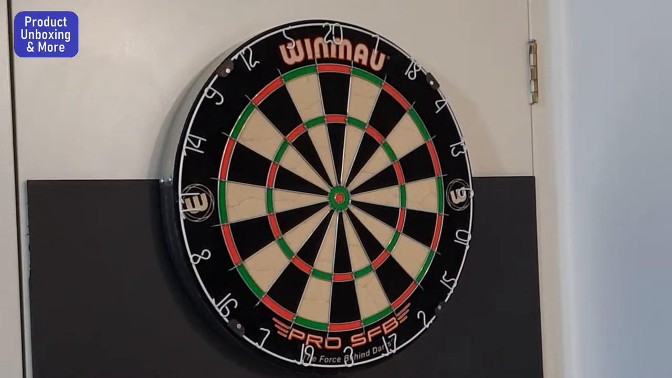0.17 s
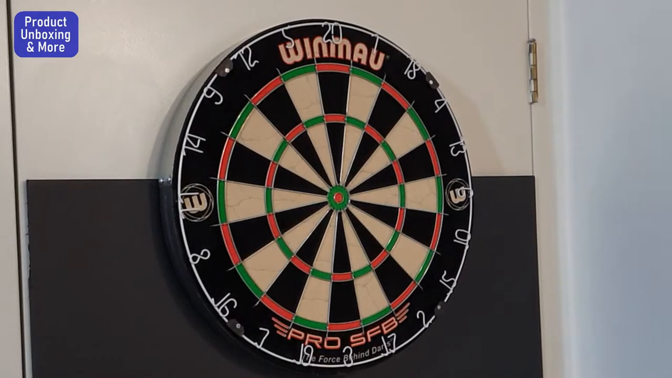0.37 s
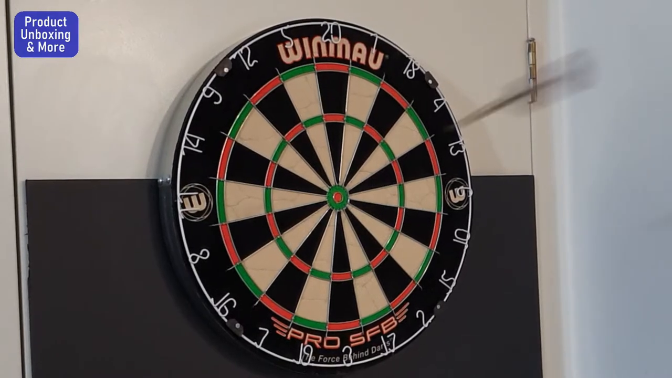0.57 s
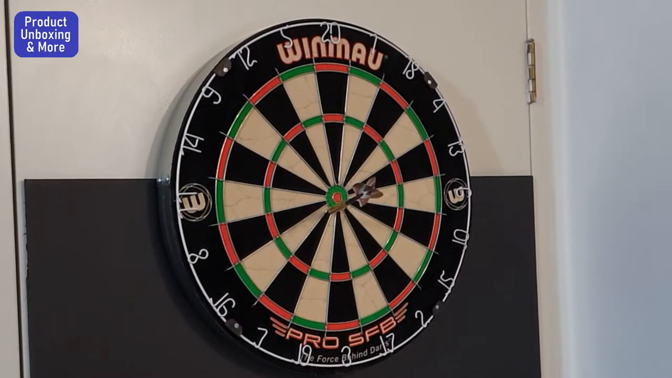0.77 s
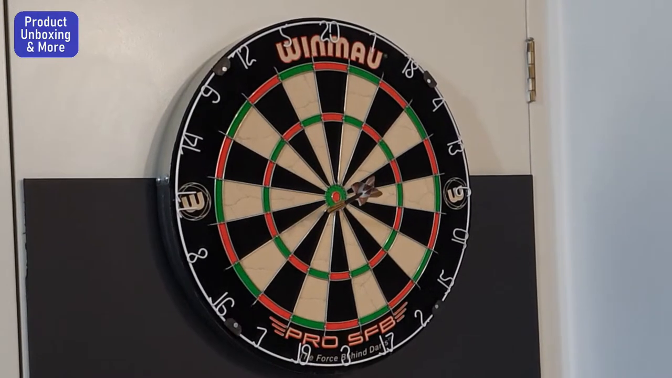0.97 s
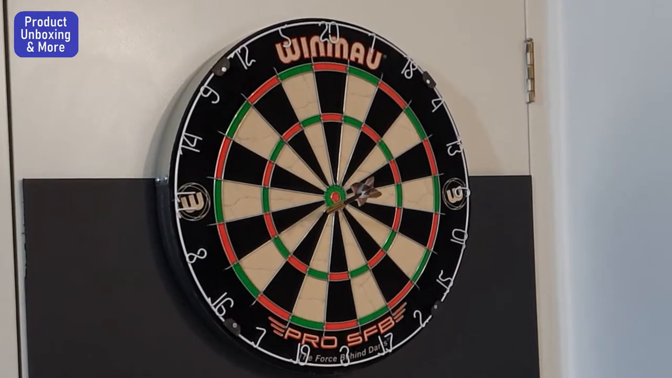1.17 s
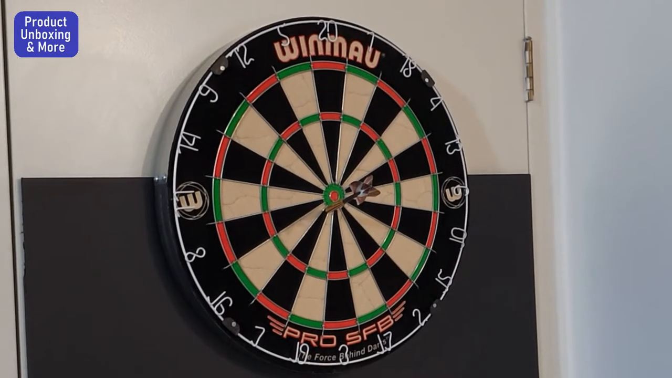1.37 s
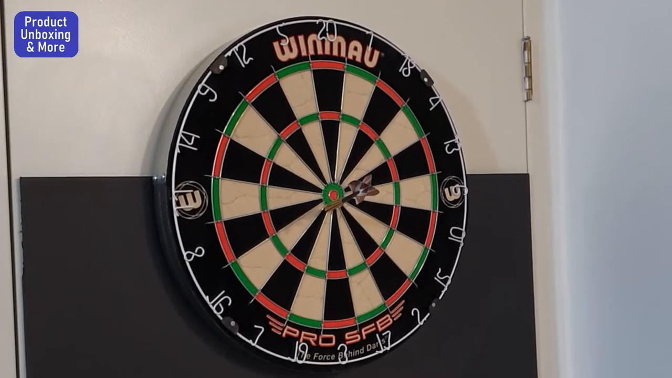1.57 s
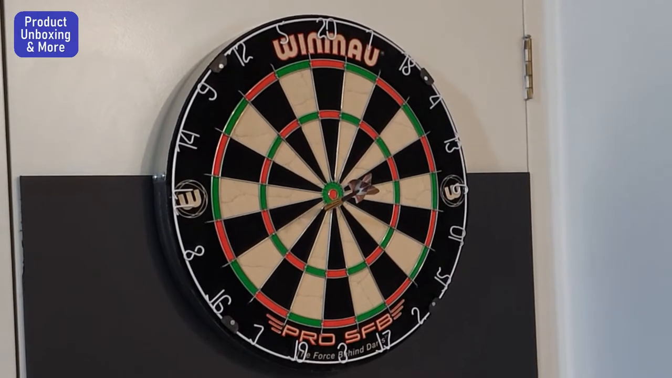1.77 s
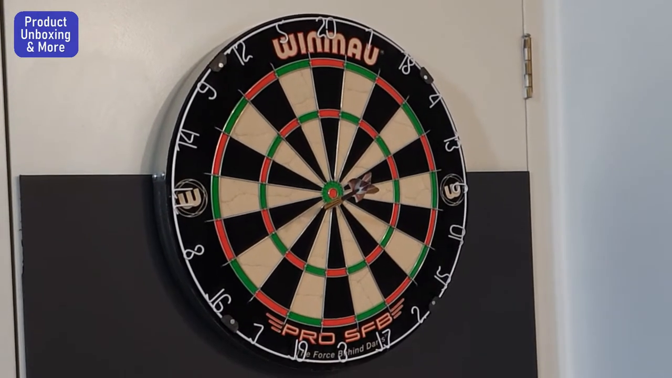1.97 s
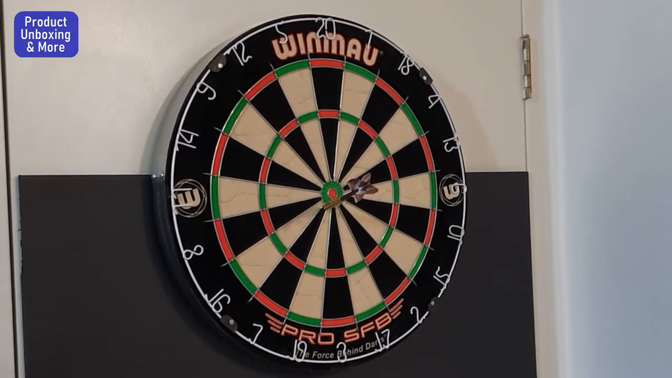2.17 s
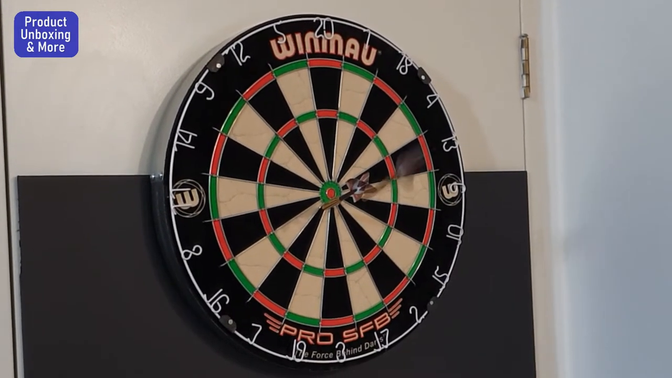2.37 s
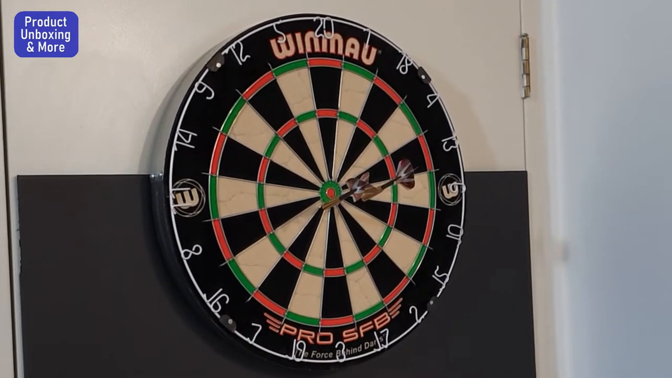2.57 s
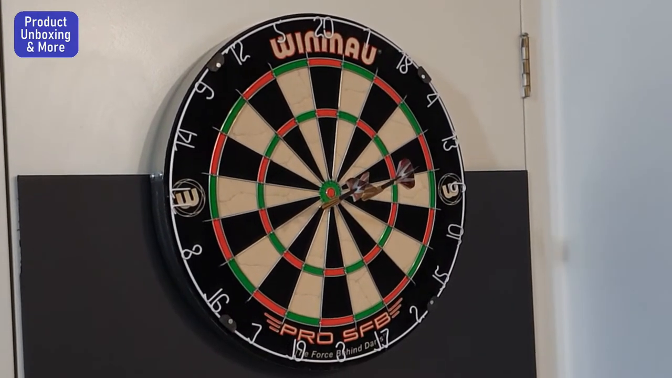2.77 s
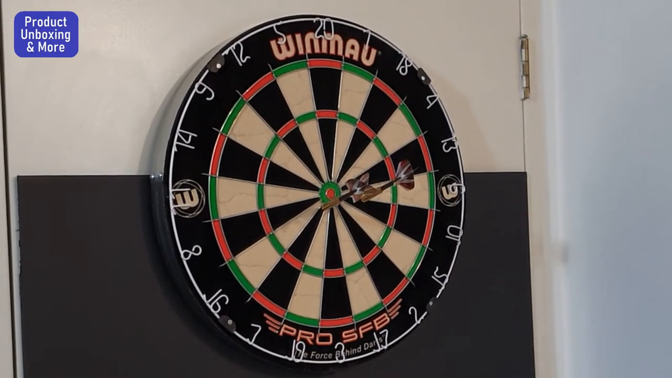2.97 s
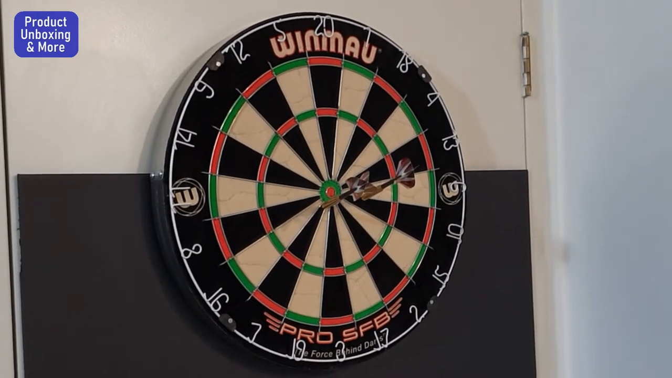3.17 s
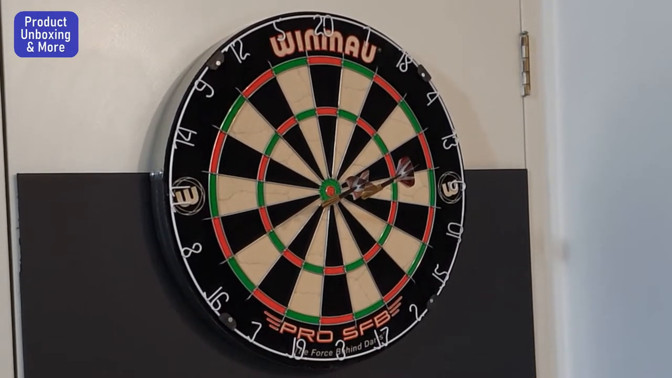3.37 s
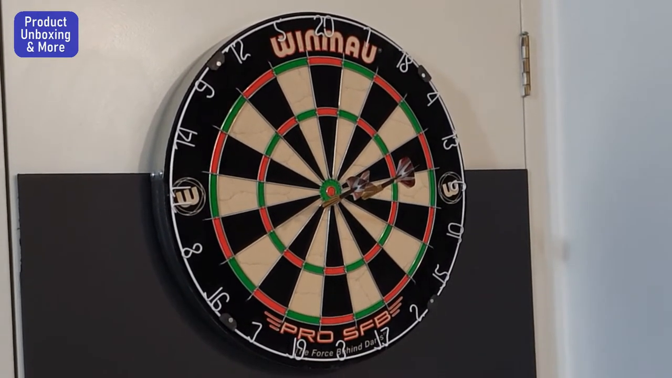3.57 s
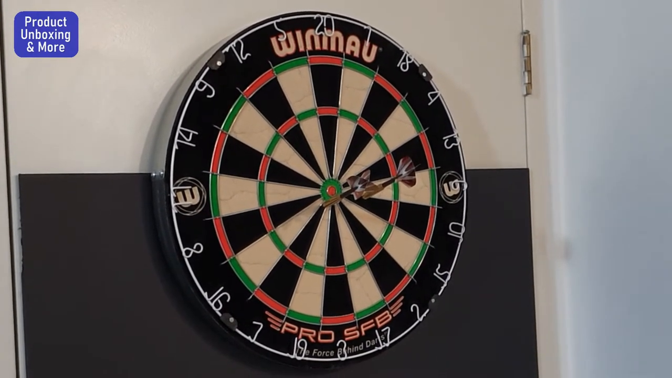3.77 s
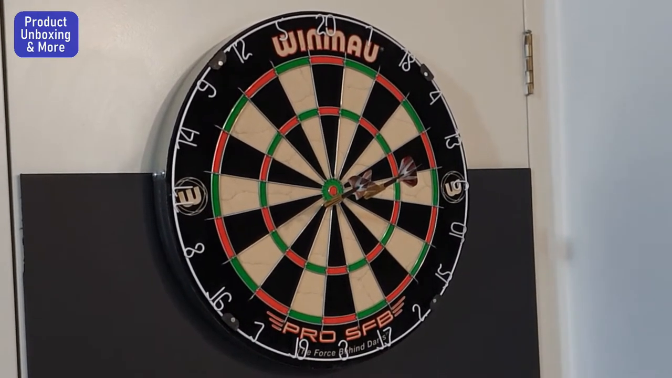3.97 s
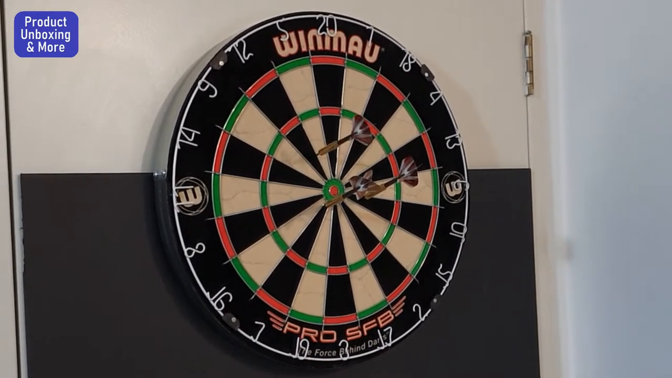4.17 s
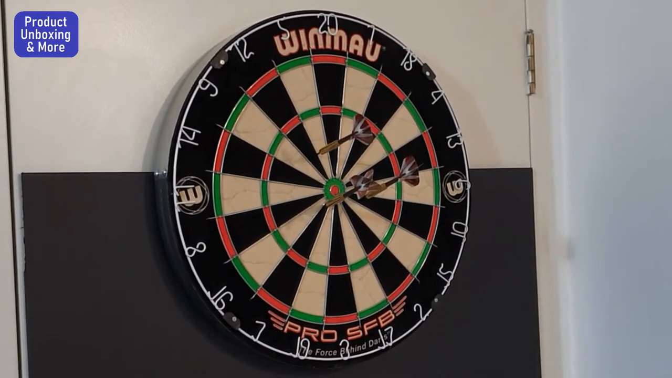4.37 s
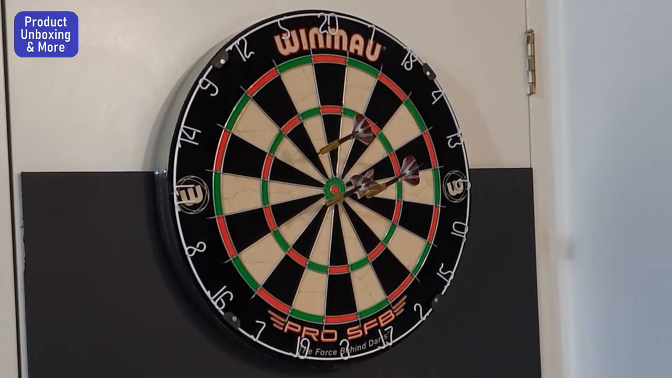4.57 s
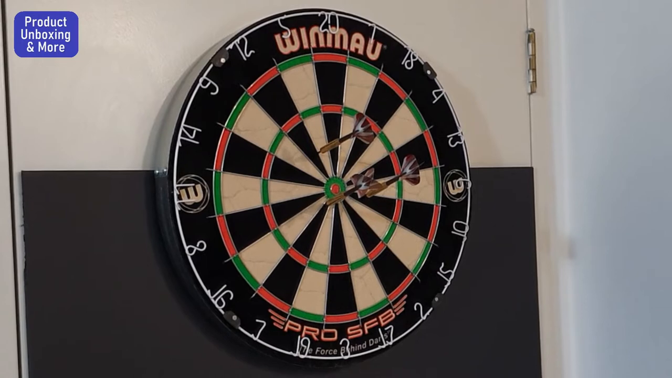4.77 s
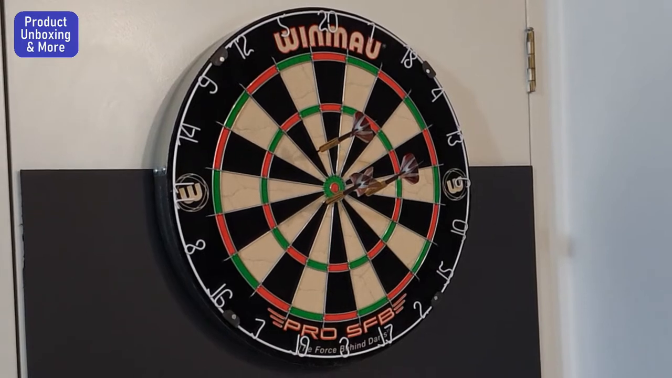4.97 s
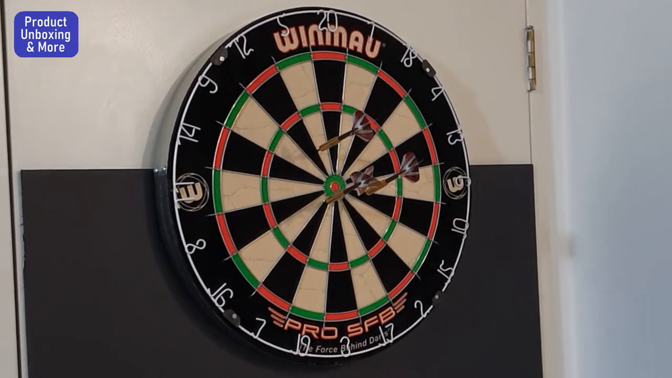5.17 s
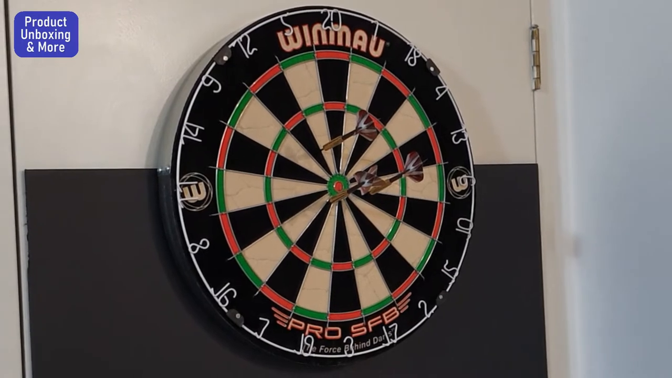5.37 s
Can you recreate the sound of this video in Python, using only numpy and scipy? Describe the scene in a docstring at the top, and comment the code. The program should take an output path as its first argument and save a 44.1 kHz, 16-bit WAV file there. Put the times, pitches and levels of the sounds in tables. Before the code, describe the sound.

In a small room with a steady electrical hum and low rumble, three darts hit a bristle board hanging on a door, a little under two seconds apart. A faint sleeve swish leads into each sharp thud, and the door booms and knocks back in its frame. The third hit is a brighter, metallic clack. Quiet clothing rustles and shoe scuffs fill the gaps, heard in stereo with a short room echo.

```python
"""A mains hum and the low rumble of a small room fade in. Clothes rustle, a sleeve swishes, and at 0.8 s
a dart thuds into a bristle board hanging on a door. The blow rings the board and shakes the door, which
knocks back in its frame. After more rustles and a swish, a second dart thuds in at 2.5 s. Soft scuffs
and another swish lead to the third, which lands at 4.2 s with a bright metallic clack.
A few last rustles and scuffs follow over the hum."""
import sys
import numpy as np
from scipy import signal
from scipy.fft import rfft, irfft
from scipy.io import wavfile
from scipy.ndimage import uniform_filter1d

SR = 44100
rng = np.random.default_rng(int(sys.argv[2]) if len(sys.argv) > 2 else 0)


def to_wav(sig):
    """Store sig (one row per channel, or 1-D mono) as 16-bit WAV at the path in sys.argv[1].

    Samples outside -1..1 are clipped; the rate is SR.
    """
    pcm = np.clip(np.atleast_2d(sig), -1, 1) * 32767
    pcm = np.round(pcm).astype(np.int16)
    wavfile.write(sys.argv[1], SR, pcm.T)  # frames by channels


N = 239806
RUB_LEAD_S, BLOW_LEAD_S = .13, .02  # time kept ahead of a rub's loudest moment, and ahead of a blow


def gain_of(db):
    """Turns decibels into a number to multiply by."""
    return 10 ** (np.asarray(db) / 20)


def unit_rms(x):
    """Scales a sound to an average (rms) level of 1."""
    return x / np.sqrt(np.mean(x ** 2) + 1e-20)


def curve_at(points, hz):
    """Joins a table's points along a pitch scale and gives the values at hz."""
    point_hz, value = np.transpose(points)
    return np.interp(np.log(hz + 1), np.log(point_hz + 1), value)


def bins(size):
    """The frequencies in a sound of so many samples."""
    return np.fft.rfftfreq(size, 1 / SR)


def add(mix, start_s, sound):
    """Adds a stereo sound to the mix at a given time."""
    part = mix[:, max(round(start_s * SR), 0):][:, :sound.shape[1]]
    part += sound[:, :part.shape[1]]


def shaped(x, db):
    """Turns each frequency up or down by its own number of dB."""
    return irfft(rfft(x) * gain_of(db), x.shape[-1])


def sides(lean_db):
    """The dB for left and right that make the left louder by lean_db."""
    return np.array([[.5], [-.5]]) * lean_db


def flattened(x, width):
    """Evens out the spectrum, averaging over `width` neighbouring frequencies."""
    spectrum = rfft(x)
    power = abs(uniform_filter1d(abs(spectrum) ** 2, width, axis=-1))
    return irfft(spectrum / np.sqrt(power + 1e-12), x.shape[-1])


# Sound in the room. Each row: frequency in Hz, how alike left and right are from 0 to 1.
ROOM_LIKENESS = [(60, 0.94), (250, 0.83), (500, 0.61), (1000, 0), (2000, 0), (5000, 0.051), (15000, 0)]


def stereo_noise(size, likeness=ROOM_LIKENESS):
    """White noise at two microphones, alike in the bass and unrelated in the treble."""
    left, other = rfft(rng.standard_normal((2, size)))
    same = np.clip(curve_at(likeness, bins(size)), -1, 1)
    right = same * left + np.sqrt(1 - same ** 2) * other
    return irfft(np.array([left, right]), size)


# The quiet room's noise. Each row: frequency in Hz, relative level in dB.
AIR_TONE = [(20, -17), (38, 2), (60, 1), (85, 4), (125, -14), (300, -14), (450, -17), (640, -16.5),
            (800, -25), (1250, -25.5), (2000, -35.5), (4000, -42.5), (10000, -56.5), (15500, -60.5)]
# Its balance. Each row: frequency in Hz, dB by which the left is louder.
AIR_LEAN = [(100, -0.5), (500, 4.5), (1200, 0.5), (4200, 1), (5200, 21.5), (7500, 11), (9200, 28.5),
            (11000, 7.5), (15000, 19)]
# Mains and motor tones. Each row: frequency in Hz, level in dB.
HUM_TONES = [(100.0, -48), (150, -69), (287, -72.5), (342, -70.5), (560, -78), (618, -73.5)]


def background(air_db=-52, waver_db=1.1, waver_points=40):
    """Wavering mains hum and faint motor tones over low rumble and microphone hiss."""
    t, hz = np.arange(N) / SR, bins(N)
    air = unit_rms(shaped(stereo_noise(N), curve_at(AIR_TONE, hz) + sides(curve_at(AIR_LEAN, hz))))
    hum = np.zeros(N)
    for tone_hz, db in HUM_TONES:
        waver = np.interp(t, np.linspace(0, t[-1], waver_points), rng.standard_normal(waver_points))
        tone = np.sqrt(2) * np.sin(2 * np.pi * (tone_hz * t + rng.random()))
        hum += gain_of(db + waver_db * waver) * tone
    return gain_of(air_db) * air + hum * gain_of(sides(lean_db=1.96))


def rub(centre_hz, octaves, size=32768, steepness_db=42):
    """The noise of rubbing, strongest around its centre frequency."""
    widths_away = np.log2((bins(size) + 1) / centre_hz) / octaves
    return unit_rms(shaped(stereo_noise(size), -steepness_db * np.log10(1 + widths_away ** 2 / 2)))


def swell(peak_s, rise_s, fall_s, size=32768):
    """A loudness curve that rises softly to a peak, then fades."""
    t = np.arange(size) / SR - peak_s
    return np.exp(-(np.minimum(t, 0) / rise_s) ** 2 - np.maximum(t, 0) / fall_s)


# Soft scuffs. Each row: peak time and rise time in seconds, level in dB, centre in Hz,
# hollow ring in dB compared with the scrape.
SCUFFS = [(3.21, 0.022, -54, 660, 3), (3.43, .04, -56, 1120, -19), (4.09, .05, -58, 900, -10.5),
          (5.12, 0.026, -47.5, 900, 1), (5.42, 0.051, -58.5, 1020, 0)]
# The hollow ring under a scuff. Each row: frequency in Hz, relative level in dB.
HOLLOW_TONES = [(525, 1.5), (563, -4.5), (612, -10.5)]


def scuffs(size=32768, wander=0.03, ring_lag_s=.025):
    """Short rubs, as of shoes on the floor; the heavier ones ring hollow and unsteady."""
    out, t = np.zeros((2, N)), np.arange(size) / SR
    for peak_s, rise_s, db, centre_hz, hollow_db in SCUFFS:
        scrape = rub(centre_hz, octaves=0.67) * swell(RUB_LEAD_S, rise_s, fall_s=0.067)
        drifts = wander * np.cumsum(rng.standard_normal((len(HOLLOW_TONES), size)), axis=1)
        tones = sum(gain_of(tone_db) * np.sin(2 * np.pi * hz * t + drift)
                    for (hz, tone_db), drift in zip(HOLLOW_TONES, drifts))
        ring = unit_rms(tones) * swell(RUB_LEAD_S + ring_lag_s, rise_s=0.037, fall_s=.055)
        add(out, peak_s - RUB_LEAD_S, gain_of(db) * (scrape + gain_of(hollow_db) * ring))
    return out


# The hiss of cloth. Each row: frequency in Hz, relative level in dB.
HISS_TONE = [(2000, -6.5), (4000, -5), (6000, -0.5), (8000, -5), (9700, -4), (12000, -9.5), (14500, -8),
             (16000, -3.5)]


def cloth_hiss(size):
    """The fine hiss of sliding cloth, a little to the left."""
    return unit_rms(shaped(stereo_noise(size), curve_at(HISS_TONE, bins(size)) + sides(lean_db=2)))


# Cloth rustles; the narrow ones almost squeak. Each row: peak time and length in seconds,
# rub level in dB, centre in Hz, width in octaves, hiss level in dB.
RUSTLES = [(0.153, 0.1, -60.5, 2800, 0.34, -69.5), (1.18, 0.14, -67, 1580, 1.06, -78),
           (1.602, 0.086, -57.5, 1853, 0.26, -74.5), (1.628, 0.076, -62.5, 3030, 0.19, -62.5),
           (1.762, 0.1, -59, 1590, 0.62, -82), (2.133, .17, -63.5, 1970, 0.6, -69.5),
           (2.948, 0.12, -70.5, 2560, 0.27, -90), (3.174, .1, -72.5, 2700, 0.21, -93.5),
           (4.58, 0.33, -63, 1085, 1.18, -73), (4.771, 0.085, -63.5, 1376, 1.1, -67)]


def rustles(rise_share=0.39):
    """Small movements of the clothes: a rub and some hiss swell and fade together."""
    out = np.zeros((2, N))
    for peak_s, length_s, db, centre_hz, octaves, hiss_db in RUSTLES:
        cloth = gain_of(db) * rub(centre_hz, octaves) + gain_of(hiss_db) * cloth_hiss(size=32768)
        loudness = swell(RUB_LEAD_S, rise_share * length_s, (1 - rise_share) * length_s)
        add(out, peak_s - RUB_LEAD_S, cloth * loudness)
    return out


# The sleeve's swish. Each row: frequency in Hz, relative level in dB.
SWISH_TONE = [(300, -9), (600, -6.5), (1500, 1.5), (2800, 1.5), (4500, -12), (8000, -20.5)]
# The arm's swings. Each row: start and fastest moment in seconds before the hit, hiss and swish in dB.
THROWS = [(0.29, 0.094, -64.5, -56.5), (0.26, 0.091, -64.5, -63.5), (0.33, 0.14, -64, -56.5)]


def sleeve(slide_rise_s=0.018, hiss_fall_db_per_s=109.5, rise_db_per_s=73, fall_db_per_s=128.5):
    """Cloth hisses over the arm all through a throw; the swish peaks when the arm is fastest."""
    t, out = np.arange(N) / SR, np.zeros((2, N))
    hiss = cloth_hiss(N)
    swish = unit_rms(shaped(stereo_noise(N), curve_at(SWISH_TONE, bins(N))))
    for (hit_s, *_), (start_s, fastest_s, hiss_db, swish_db) in zip(DARTS, THROWS):
        sliding = .5 + .5 * np.tanh((t - hit_s + start_s) / slide_rise_s)
        peak_s = hit_s - fastest_s
        before, after = np.maximum(peak_s - t, 0), np.maximum(t - peak_s, 0)
        out += sliding * hiss * gain_of(hiss_db - hiss_fall_db_per_s * after)
        out += sliding * swish * gain_of(swish_db - rise_db_per_s * before - fall_db_per_s * after)
    return out


# The room's echo. Each row: frequency in Hz, seconds to fade by 60 dB.
ECHO_FADE = [(100, 0.52), (300, 0.32), (700, 0.32), (1500, 0.28), (3000, 0.28), (6000, 0.26), (10000, 0.24),
             (15000, 0.19)]
# A blow's bass builds slowly, so it is strong in the echo. Each row: frequency in Hz, boost in dB.
ECHO_TONE = [(100, 6), (200, 2), (300, 0.5), (500, 1), (800, -3), (1500, -2.5), (15000, -1)]
# The echo's balance. Each row: frequency in Hz, dB by which the left is louder.
ECHO_LEAN = [(100, 4), (300, 2), (600, 1), (1200, 2), (2300, -1), (4500, 2), (9000, 7.5), (15000, -0.5)]


def room_echo(size=32768, build_s=0.0081):
    """Reflections thicken over the first milliseconds; the treble dies first."""
    hz, slice_s, slices = signal.stft(stereo_noise(size, ROOM_LIKENESS), SR, nperseg=256)
    decay = gain_of(-60 * np.maximum(slice_s - BLOW_LEAD_S, 0) / curve_at(ECHO_FADE, hz)[:, None])
    tail = signal.istft(slices * decay, SR, nperseg=256)[1][:, :size]
    age_s = np.maximum(np.arange(size) / SR - BLOW_LEAD_S, 0)
    onset = 1 - np.exp(-(age_s / build_s) ** 2)
    tone_db = curve_at(ECHO_TONE, bins(size)) + sides(curve_at(ECHO_LEAN, bins(size)))
    return shaped(flattened(tail * onset, width=40) * onset, tone_db)


# The door's own low notes. Each row: frequency in Hz, relative level in dB, seconds to fade by 60 dB.
DOOR_NOTES = [(55, -5.5, .25), (65.9, 0.5, 0.46), (72, -6.5, 0.24), (73.2, -4.5, 0.4), (90.1, -10, 0.21),
              (100, -10, 0.099), (105.4, 1.5, 0.3), (126.6, -6.5, 0.2), (151.7, -1.5, 0.31)]


def door(rise_s, dull_db):
    """The shaken door booms, alike on both sides; its notes lose dull_db for each octave up."""
    t, lowest_hz = np.arange(SR) / SR, DOOR_NOTES[0][0]
    boom = np.zeros(SR)
    for hz, db, fade_s in DOOR_NOTES:
        level_db = db - dull_db * np.log2(hz / lowest_hz) - 60 * t / fade_s
        boom += gain_of(level_db) * np.sin(2 * np.pi * hz * t)
    return np.tile(boom * (1 - np.exp(-t / rise_s)), (2, 1))


# The crunch of the point going in. Each row: frequency in Hz, how alike left and right are from 0 to 1.
BITE_LIKENESS = [(60, 1), (500, 1), (1000, 0.13), (2000, 0.073), (5000, 0.02), (15000, 0)]
# Its tone, weak in the upper bass. Each row: frequency in Hz, level in dB.
BITE_TONE = [(100, -1.5), (200, -7), (350, -7), (500, -3.5), (750, -3.5), (1500, -3), (3000, -1.5),
             (9000, -3.5), (14000, -2)]
# Its balance. Each row: frequency in Hz, dB by which the left is louder.
BITE_LEAN = [(100, -4.5), (450, 3.5), (800, 7.5), (1200, -1.5), (2000, 0.5), (2800, -4.5), (3800, -2.5),
             (5000, 1.5), (7000, 7), (10000, 1.5), (15000, -8.5)]


def bite(length_s, size=32768, grip_growth=.1):
    """The point drives into the fibres: a dense crunch that lasts until the dart stops."""
    progress = np.maximum(np.arange(size) / SR - BLOW_LEAD_S, 0) / length_s
    grip = (progress > 0) * (1 + grip_growth * progress) / (1 + progress ** 10)
    crunch = flattened(stereo_noise(size, BITE_LIKENESS) * grip, width=70)
    crunch = flattened(crunch * np.minimum(2 * grip, 1), width=160)
    return shaped(crunch, curve_at(BITE_TONE, bins(size)) + sides(curve_at(BITE_LEAN, bins(size))))


def ringing_click(spectrum_db):
    """A click with this spectrum that starts at once and then rings out, with energy 1."""
    log_gain = np.log(gain_of(np.r_[spectrum_db, spectrum_db[-2:0:-1]]))
    spectrum = np.exp(np.conj(signal.hilbert(log_gain)))  # puts the energy as early as possible
    click = np.fft.ifft(spectrum).real[:len(spectrum_db) // 2]
    return click / np.linalg.norm(click)


# Each blow's tone, set by where the point goes in. Each row: one dart's pairs of Hz and relative dB.
BLOW_TONES = [
    [(120, -5), (190, -8.5), (320, 2.5), (480, -6), (630, -4), (830, -10), (1150, 2), (1700, -3),
     (2400, -4), (3200, -18), (4300, -23), (7000, -39.5), (9500, -41), (15000, -71.5)],
    [(120, -17.5), (190, -7), (300, 1.5), (480, -5.5), (650, -2.5), (900, -1), (1080, -4), (1450, 1.5),
     (2100, -11.5), (3200, -13), (4400, -26.5), (7000, -37), (9500, -41.5), (15000, -55)],
    [(120, -26.5), (190, -11), (320, -2.5), (480, -10), (700, -6), (1000, -10), (1600, -1.5), (2100, -8),
     (3200, -6.5), (4700, -12.5), (7000, -21), (9300, -22.5), (11000, -22), (14500, -25)],
]
# Where the board, its wires and the darts ring. Each row: frequency and width in Hz,
# then the boost in dB for the first, second and third dart.
BOARD_RINGS = [(256, 46, 5.9, 8.9, 5), (337, 29, 5.4, 8.8, 3.9), (629, 110, 9.9, 3, 1.7),
               (638, 41, 1, 7.2, 2), (817, 9.6, 2.5, 2.9, 4), (872, 67, 6.1, 5.1, 6.2),
               (926, 28, 1.8, 10, 4), (1200, 48, 4.3, 6.5, 11), (1335, 60, 2.3, 4.4, 4.4),
               (1596, 160, 5, 6, 11.3), (1890, 50, 7.7, 1.9, 3.9), (2320, 200, 3.9, 11, 8.1),
               (2640, 70, 2, 4, 5.04), (2660, 270, 3.7, 2.86, 0.98), (3530, 98, 1, 5.9, 3),
               (9090, 680, 4.6, 2, 8.1)]


def board(dart, size=16384):
    """One dart's blow, coloured by the ringing it sets off in the board."""
    hz = bins(size)
    boost_db = sum(boosts[dart] / (1 + (2 * (hz - ring_hz) / width_hz) ** 2)
                   for ring_hz, width_hz, *boosts in BOARD_RINGS)
    return ringing_click(curve_at(BLOW_TONES[dart], hz) + boost_db)


# The three hits. Each row: time in seconds, thud level in dB, bite length in seconds, echo boost in dB,
# dB by which the bite is louder on the right, door level in dB, door dullness in dB per octave,
# seconds from the hit to the door's boom and to its knock back, boost of that knock in dB.
DARTS = [(0.7625, 10, 0.0052, 1.6, -1.3, -28.5, -0.8, 0.0025, 0.07, 3),
         (2.506, 13, 0.0069, -1.7, -1, -28, -1.5, 0.0026, 0.079, 0),
         (4.248, 14, 0.011, -2.5, 2.5, -28, 5.5, .0046, .076, 2.5)]


def darts():
    """Each dart bites, rings the board into the room, and sets the door booming and knocking back."""
    out = np.zeros((2, N))
    for dart, row in enumerate(DARTS):
        hit_s, db, bite_s, echo_db, right_db, door_db, dull_db, boom_s, knock_s, knock_db = row
        crunch_and_echo = bite(bite_s) * gain_of(sides(-right_db)) + gain_of(echo_db) * room_echo()
        thud = signal.fftconvolve(crunch_and_echo[:, :SR // 2], board(dart)[None], axes=1)
        add(out, hit_s - BLOW_LEAD_S, gain_of(db) * thud)
        add(out, hit_s + boom_s, gain_of(door_db) * door(rise_s=0.0031, dull_db=dull_db))
        add(out, hit_s + knock_s, gain_of(door_db + knock_db) * door(rise_s=0.0044, dull_db=dull_db + 3))
    return out


def scene():
    """Darts, the thrower's small movements and the room."""
    return darts() + sleeve() + rustles() + scuffs() + background()


def record(dry, low_cut_hz=38, high_cut_hz=15400, fade_s=0.18):
    """The microphone loses the deepest bass, the sound fades in, and the highest treble is cut."""
    thinned = signal.sosfilt(signal.butter(2, low_cut_hz, "high", fs=SR, output="sos"), dry)
    faded = thinned * (1 - np.exp(-(np.arange(N) / SR / fade_s) ** 2))
    treble_cut = signal.firwin(511, high_cut_hz, window=("kaiser", 9), fs=SR)
    return signal.oaconvolve(faded, treble_cut[None], "same")


dry = scene()
out = record(dry)
to_wav(out)
```